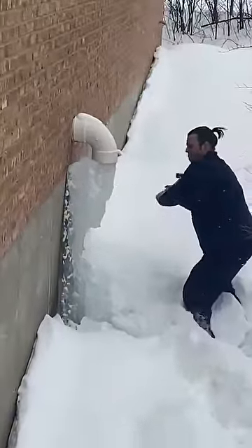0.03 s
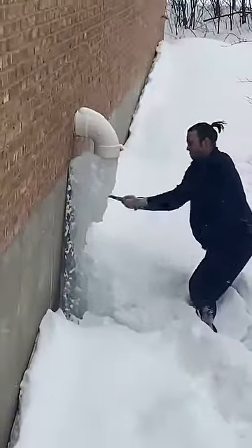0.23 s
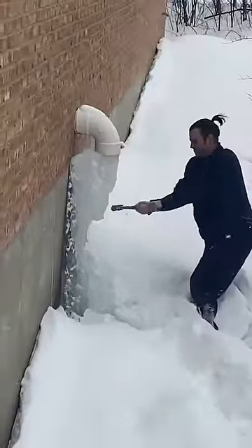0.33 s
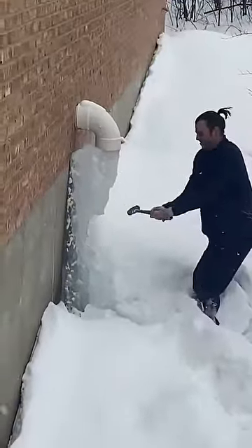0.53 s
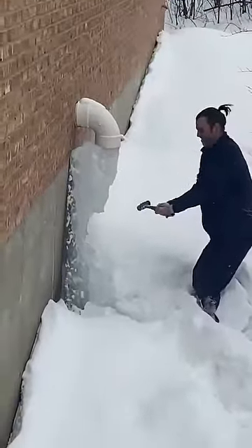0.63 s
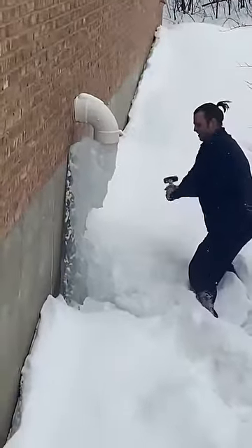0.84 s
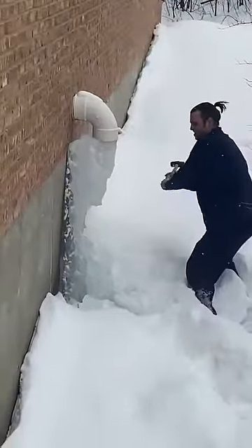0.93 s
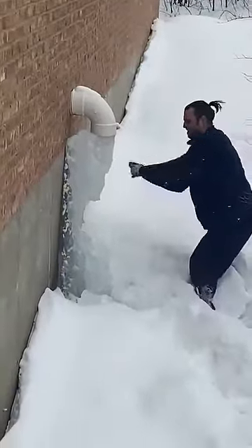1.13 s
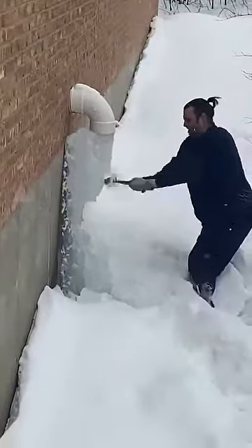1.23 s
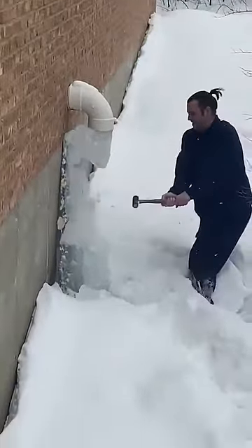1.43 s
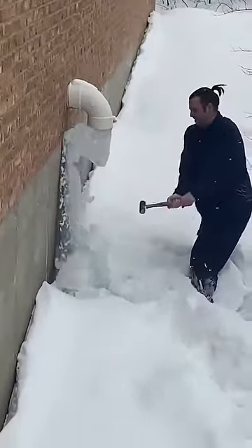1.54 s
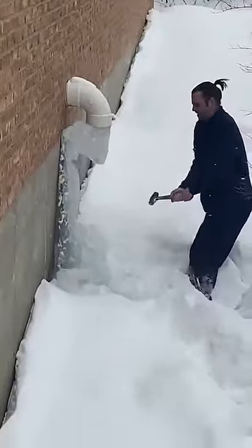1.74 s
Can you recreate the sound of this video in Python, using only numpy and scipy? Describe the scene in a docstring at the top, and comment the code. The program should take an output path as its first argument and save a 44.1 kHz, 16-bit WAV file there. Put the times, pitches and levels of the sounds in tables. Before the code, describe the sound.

A hammer strikes a thick ice column at about 0.2 seconds with a sharp crack and a briefly ringing thump. Chips clink and small lumps knock down until about 1.1 seconds. A second blow comes at 1.2 seconds. At 1.5 a slab lands with a solid knock and crunch, and pieces clatter and crumble until 1.8. Faint echoes and a low, steady outdoor rumble lie underneath.

```python
"""Hammering a column of ice

A hammer hits thick ice twice, beside a brick wall in deep snow, over a low outdoor rumble.
Each blow cracks the surface and sends a falling thump through the column, which rings.
Chips clink down, lumps knock and crumble, and fine crumbs patter. The second blow frees
a slab that lands on the icy foot. The wall and the yard add faint echoes."""
import sys
import numpy as np
from scipy import signal
from scipy.fft import rfft, irfft
from scipy.io import wavfile

SR = 44100
rng = np.random.default_rng(int(sys.argv[2]) if len(sys.argv) > 2 else 0)


def store_pcm(level_fs):
    """Save levels as 16-bit WAV."""
    pcm = np.round(np.clip(level_fs, -1, 1) * 32767).astype(np.int16)
    wavfile.write(sys.argv[1], SR, np.atleast_2d(pcm).T)


N = 79380  # 1.8 seconds


def gain(db):
    """Turn decibels into a number to multiply by."""
    return 10 ** (np.asarray(db) / 20)


def since(start):
    """Seconds since start, zero before it."""
    return np.maximum(np.arange(N) / SR - start, 0)


def swell(start, rise, decay):
    """A level that climbs in a straight line, then dies away; times in seconds."""
    t = since(start)
    return np.minimum(t / rise, 1) * np.exp(-np.maximum(t - rise, 0) / decay)


def ring(start, hz, ring_s):
    """One struck tone that fades by 60 dB in ring_s seconds."""
    t = since(start)
    return np.sin(2 * np.pi * hz * t) * np.exp(-np.log(1000) * t / ring_s)


def cut_lows(x, hz):
    """Turn down everything below hz."""
    return signal.sosfilt(signal.butter(2, hz, "high", fs=SR, output="sos"), x)


def colour(x, curve):
    """Shape x with a curve of (frequency [Hz], level [dB]), then set its strength (rms) to 1."""
    hz, db = np.array(curve, float).T
    f = np.maximum(np.fft.rfftfreq(N, 1 / SR), 1)
    shaped = irfft(rfft(x) * gain(np.interp(np.log(f), np.log(hz), db)), N)
    return shaped / shaped.std()


# Tone colour of the distant rumble (frequency [Hz], level [dB])
RUMBLE_COLOUR = [(20, -6), (35, -7), (60, 0), (120, -6), (175, 0.5), (250, -8.5), (500, -11), (900, -14),
                 (1500, -25), (3000, -34), (5500, -40.5), (9000, -44.5), (16000, -46)]
def outdoors():
    """A steady distant rumble with a wavering low hum."""
    middle, side = (colour(rng.standard_normal(N), RUMBLE_COLOUR) for _ in range(2))
    rumble = middle + gain(-13.5) * side * np.array([[1], [-1]])  # added left, subtracted right
    waver = colour(rng.standard_normal(N), [(3, 0), (30, -50), (300, -120)])
    hum_hz = 96.5 * (1 + 0.036 * waver)
    hum = (1 + 0.29 * waver) * np.sin(2 * np.pi * np.cumsum(hum_hz) / SR)
    return gain(-41) * rumble + gain(-44) * hum


def fractures(curve, per_s, spread_db):
    """Many tiny breaks in the ice, each a click; spread_db makes their sizes uneven."""
    breaks = rng.random(N) < per_s / SR
    size = gain(spread_db * np.minimum(rng.exponential(size=N), 4))
    return colour(breaks * size * rng.choice([-1, 1], N), curve)


def splinters(count, low_hz=2111, high_hz=14980, decay_cycles=13.3, spread_db=2.5):
    """A cloud of tiny splinters, each pinging at its own pitch."""
    t = np.arange(2048) / SR
    out = np.zeros(N + len(t))
    for when, pitch, softness in rng.random((count, 3)):
        hz = low_hz * (high_hz / low_hz) ** pitch
        ping = np.sin(2 * np.pi * hz * t) * np.exp(-t * hz / decay_cycles)
        first = int(when * N)
        out[first:first + len(t)] += gain(-spread_db * np.log(softness + 0.0066)) * ping
    return out[:N] / out.std()


def thump(start, first_hz, last_hz, glide_s):
    """Waves bend the column: a thump that falls in pitch, its bounce off the wall and a deep thud."""
    rise_s, hold_s, fade_s, echo_s = 0.0012, 0.0074, 0.00069, 0.0064
    thud_hz, thud_delay_s, thud_width_s = 118, 0.0097, 0.011
    t = since(start)
    hz = last_hz + (first_hz - last_hz) * np.exp(-(t / glide_s) ** 2)
    level = np.minimum(t / rise_s, 1) * np.exp(-np.maximum(t - hold_s, 0) / fade_s)
    direct = level * np.sin(2 * np.pi * np.cumsum(hz * (t > 0)) / SR)
    echo = np.interp(since(echo_s), since(0), direct)
    thud = np.sin(2 * np.pi * thud_hz * t) * np.exp(-((t - thud_delay_s) / thud_width_s) ** 2)
    return direct + gain(-16.5) * echo + gain(-19.5) * thud


# The column's natural tones (pitch [Hz], level [dB], ring time [s])
COLUMN_TONES = [(57, -28, 0.18), (91.8, -23, 0.29), (200, -13, 0.013), (350, -9, 0.073), (446, -41.5, 0.16),
                (604, -17.5, 0.054), (1310, -34, 0.066), (1800, -49, .1), (2990, -51, 0.033),
                (4136, -19, 0.025)]
def column(start):
    """The struck column rings with all its natural tones at once."""
    tones = sum(gain(db) * ring(start, hz, ring_s) for hz, db, ring_s in COLUMN_TONES)
    return tones * np.minimum(since(start) / 0.0026, 1)


# Tone colours of the crack, the spray and the low shudder (frequency [Hz], level [dB])
CRACK_COLOUR = [(150, -17), (700, -5), (1400, 10.5), (2300, 0), (4100, 1), (6000, 3), (8000, -5),
                (10000, -7.5), (13000, -8.5), (16000, -25)]
SPRAY_COLOUR = [(100, -6), (350, 18.5), (600, 8), (1000, 6), (2000, 1), (4000, 2.5), (6000, -20),
                (9000, -6.5), (16000, -13)]
SHUDDER_COLOUR = [(20, -21), (55, 4), (110, -3.5), (190, -8.5), (300, -5), (800, -41)]
# Hammer blows (time [s], thump level [dB], first pitch [Hz], last pitch [Hz], glide time [s],
# crack level [dB], crushing time [s], snap level [dB], thump delay [s], spray level [dB],
# spray decay [s], shudder decay [s])
HAMMER_BLOWS = [(0.22, 0, 901, 268, 0.002093, -10, 0.0025, -20, 0.00012, -31, 0.051, 0.072),
                (1.1739, -2.5, 1020, 245.5, 0.002, -13, 0.0027, -32, 0.000757, -25, 0.021, 0.039)]
def hammer():
    """Each blow cracks and snaps the surface; the column thumps, rings, shudders and sprays splinters."""
    crack = fractures(CRACK_COLOUR, per_s=26000, spread_db=2.5)
    spray = fractures(SPRAY_COLOUR, per_s=6500, spread_db=4.5) + gain(-10) * splinters(count=1500)
    shudder = colour(rng.standard_normal(N), SHUDDER_COLOUR)
    out = np.zeros(N)
    for (start, thump_db, first_hz, last_hz, glide_s, crack_db, crush_s,
         snap_db, delay_s, spray_db, spray_s, shudder_s) in HAMMER_BLOWS:
        thump_at = start + delay_s
        out += gain(crack_db) * crack * swell(start, 0.00019, crush_s)
        out += gain(snap_db) * ring(thump_at, hz=1684, ring_s=0.014)
        out += gain(thump_db) * (thump(thump_at, first_hz, last_hz, glide_s) + column(thump_at))
        out += gain(spray_db) * spray * swell(start, 0.0011, spray_s)
        out += gain(-28) * shudder * swell(start, 0.0027, shudder_s)
    return out


# Tone colour of sound glancing off the bricks (frequency [Hz], level [dB])
BRICK_COLOUR = [(60, -43), (250, -26), (600, -21), (1200, -11), (2500, -23), (5000, -53), (10000, -13)]
def brick_echo(x, decay_s=0.0032):
    """The wall scatters sound straight back, which makes the ice seem a little wider."""
    burst = rng.standard_normal(N) * np.exp(-since(0) / decay_s)
    burst /= np.linalg.norm(burst)
    tint = gain(np.interp(np.fft.rfftfreq(N, 1 / SR), *np.array(BRICK_COLOUR).T))
    return irfft(rfft(x) * rfft(burst) * tint, N) * np.array([[1], [-1]])


def yard_echo(x, ring_s=0.4):
    """A faint, thin echo from the walls and trees."""
    tails = rng.standard_normal((2, N)) * swell(0.0034, 0.0012, ring_s / np.log(1000))
    middle, side = tails / np.sqrt(np.sum(tails ** 2, axis=1, keepdims=True))
    tail = middle + gain(-21) * side * np.array([[1], [-1]])
    thin = cut_lows(x, hz=950)
    return gain(-14) * signal.fftconvolve(thin[None], tail, axes=1)[:, :N]


# Tone colour of small bits of ice, both chips and crumbs (frequency [Hz], level [dB])
ICE_BIT_COLOUR = [(200, 6.5), (900, 8), (1700, 5), (3000, -4.5), (6000, 0.5), (8500, -1.5), (11500, -2.5),
                  (16000, -8)]
# Chips hitting the ice
# (time [s], click level [dB], click decay [s], ring level [dB], pitch [Hz], ring time [s])
CHIP_HITS = [(0.316, -37.5, 0.0059, -36.5, 2910, 0.018), (0.4607, -31.5, 0.0034, -43, 2710, 0.047),
             (0.472, -46, .004, -41.5, 3030, 0.058), (0.4947, -33, 0.00066, -35.5, 5030, 0.0072),
             (0.5094, -32.5, 0.0036, -52, 5740, .015), (0.527, -46, .002, -42, 6360, .025),
             (0.5322, -32, 0.0022, -32.5, 6060, 0.037), (0.5364, -34, 0.0026, -37, 6300, 0.028),
             (0.541, -45, .001, -35, 6200, .025), (0.558, -34, .003, -43, 3050, 0.018),
             (0.6012, -25.5, .0012, -27.5, 5720, 0.016), (0.601, -53, 0.0018, -44, 4070, 0.1),
             (0.611, -32, 0.0019, -42, 6140, .02), (0.625, -42, .001, -38.5, 4095, .035),
             (0.6356, -34, 0.00092, -29, 2850, 0.0052), (0.639, -33, .0015, -30.5, 4160, 0.047),
             (0.68, -35, 0.002, -55, 4070, .03), (0.6887, -50, .001, -36, 2760, 0.011),
             (0.7197, -50, 0.00075, -44, 4130, 0.051), (0.7804, -37.5, .002, -35.5, 3270, 0.012),
             (1.003, -30.5, 0.0012, -35.5, 3110, 0.027), (1.0056, -31, .003, -38, 4030, 0.052),
             (1.0668, -36, .003, -46, 6040, 0.038), (1.399, -39, 0.0044, -36.5, 3070, 0.039),
             (1.426, -38, .002, -42, 2030, 0.015), (1.4416, -51, .002, -44, 3150, 0.045),
             (1.4506, -29, 0.005, -30, 2750, 0.011), (1.4968, -22, 0.0035, -37, 2370, 0.022),
             (1.555, -27, .004, -37, 2960, 0.018), (1.602, -22.5, 0.0021, -36, 5240, 0.01),
             (1.604, -50, .002, -39, 2280, .045), (1.6327, -20.5, 0.0021, -27, 4730, 0.031),
             (1.666, -27, .002, -54, 4000, 0.018), (1.724, -30, 0.0013, -46, 3200, 0.0095),
             (1.7376, -49, 0.0028, -37, 2330, .035)]
def chips():
    """Small hard pieces click and ring, their tones roughened as they chatter."""
    crackle = cut_lows(fractures(ICE_BIT_COLOUR, per_s=20000, spread_db=0), hz=1300)
    chatter = 1 + 0.3 * colour(rng.standard_normal(N), [(250, 0), (900, -30), (4000, -80)])
    out = np.zeros(N)
    for start, click_db, click_s, ring_db, hz, ring_s in CHIP_HITS:
        close_tone = gain(-21) * ring(start, hz * 1.04, ring_s / 2)
        overtone = gain(-11.5) * ring(start, hz * 1.7, ring_s / 2)
        tone = ring(start, hz, ring_s) + close_tone + overtone
        click = gain(click_db) * crackle * swell(start, 0.0006, click_s)
        # The click is a little stronger near the chip's own pitch.
        clink = signal.lfilter(*signal.iirpeak(hz, Q=1 / 0.47, fs=SR), click)
        out += gain(-3) * click + gain(-11.5) * clink + gain(ring_db) * tone * chatter
    return out


# Lumps landing on packed snow (time [s], level [dB], pitch [Hz], time to peak [s])
LUMP_HITS = [(0.332, -32, 329, 0.0043), (0.4615, -32, 970, 0.00093), (0.51, -22.5, 900, 0.00063),
             (0.562, -26, 885, 0.0008), (0.575, -28, 1140, 0.00075), (0.6387, -31, 1010, 0.00076),
             (1.325, -35, 162.5, 0.0073), (1.4518, -29, 1130, 0.00065), (1.485, -26, 1030, 0.00059),
             (1.5505, -26, 630, 0.0009), (1.5575, -43, 990, 0.00072), (1.559, -18, 500, 0.00087),
             (1.58, -34, 704, 0.002), (1.631, -31, 1140, 0.0028), (1.722, -16, 840, 0.00055),
             (1.7237, -29.5, 441, 0.0029), (1.769, -27.5, 970, 0.00048)]
def lumps(sag=0.033):
    """Bigger pieces land with a short knock that sags in pitch."""
    out = np.zeros(N)
    for start, db, hz, peak_s in LUMP_HITS:
        age = since(start) / peak_s
        pitch = hz * (1 + sag * (2 * np.exp(-age / 2) - 1))
        level = gain(db) * age * np.exp(1 - age)
        out += level * np.sin(2 * np.pi * np.cumsum(pitch * (age > 0)) / SR)
    return out


# Showers of fine crumbs (time [s], level [dB], rise [s], decay [s])
CRUMB_SHOWERS = [(0.452, -46, 0.047, 0.44), (.80, -51, 1, 0.68), (1.005, -49, 0.013, 0.086),
                 (1.25, -48, 0.075, 0.2), (1.478, -34.5, 0.016, 0.1)]
def crumbs():
    """Fine crumbs patter and tinkle down the column."""
    patter = gain(-4) * fractures(ICE_BIT_COLOUR, per_s=2800, spread_db=2.5)
    tinkle = gain(-9) * splinters(count=2500)
    level = sum(gain(db) * swell(start, rise, decay) for start, db, rise, decay in CRUMB_SHOWERS)
    return level * (patter + tinkle)


# Tone colour of crumbling ice (frequency [Hz], level [dB])
CRUNCH_COLOUR = [(100, -29), (330, 16.5), (700, 9), (1200, 6.5), (1700, -1.5), (2600, -2.5), (3600, -15.5),
                 (5500, 0), (8500, -17.5), (12000, -1.5), (16000, -23)]
# Lumps breaking apart (time [s], level [dB], rise [s], decay [s])
LUMP_BREAKS = [(0.56, -36.5, 0.003, 0.01), (1.484, -41.5, .0012, 0.038), (1.505, -22.5, 0.0018, 0.018),
               (1.547, -27.5, 0.0086, 0.028), (1.628, -35.5, 0.0032, 0.05), (1.76, -35.5, 0.004, 0.01)]
def crumbling():
    """Some lumps fall apart in a crunch of tiny breaks and splinters."""
    crunch = fractures(CRUNCH_COLOUR, per_s=1800, spread_db=3) + gain(-9.5) * splinters(count=1800)
    return crunch * sum(gain(db) * swell(start, rise, decay) for start, db, rise, decay in LUMP_BREAKS)


# The slab's natural tones (pitch [Hz], level [dB], ring time [s])
SLAB_TONES = [(340, -11.5, 0.03), (475, -21.5, 0.051), (720, -17, 0.023), (1038, -22, 0.044),
              (1260, -18, 0.021), (2003, -32.5, 0.067)]
# The slab lands and rocks back (time [s], level [dB])
SLAB_KNOCKS = [(1.5071, 0.5), (1.515, 0.5)]
def slab(contact_s=0.0011):
    """A large piece lands on the icy foot with a solid double knock."""
    out = np.zeros(N)
    for start, knock_db in SLAB_KNOCKS:
        tones = sum(gain(db) * ring(start, hz, ring_s) for hz, db, ring_s in SLAB_TONES)
        out += gain(knock_db) * np.minimum(since(start) / contact_s, 1) * tones
    return cut_lows(out, hz=218)


def scene():
    """The ice straight ahead, its echoes and the outdoor background."""
    ice = hammer() + chips() + lumps() + crumbling() + crumbs() + slab()
    return ice + brick_echo(ice) + yard_echo(ice) + outdoors()


# How far the wave at the left microphone runs ahead of the right (frequency [Hz], phase [radians])
LEFT_LEAD = [(0, 0), (400, .03), (950, .02), (1600, -.3), (2600, .15), (3500, .05), (4500, .6), (5200, .4),
             (7200, 3.1), (8700, 4.3), (10000, 6.2), (11500, 6.9), (13000, 9.3), (14700, 9.8),
             (15700, 12.3)]
# How much louder the left is than the right (frequency [Hz], level [dB])
LEFT_LOUDER = [(60, -1), (250, -0.1), (380, -0.5), (700, 2.7), (1290, 3), (2300, 0)]
def record(dry, dip_hz=405, dip_width_hz=12.9, dip_db=-6.5, ceiling=0.97, top_hz=16200):
    """Two microphones, unlike in timing and level, with a narrow dip, rounded peaks and a treble cut."""
    f = np.fft.rfftfreq(N, 1 / SR)
    lead = np.interp(f, *np.array(LEFT_LEAD).T)
    louder_db = np.interp(f, *np.array(LEFT_LOUDER).T)
    timing = np.exp(1j * np.array([lead, -lead]) / 2)
    balance = gain(np.array([louder_db, -louder_db]) / 2)
    dip = gain(dip_db * np.exp(-((f - dip_hz) / dip_width_hz) ** 2))
    heard = irfft(rfft(dry) * dip * balance * timing, N)
    rounded = ceiling * np.tanh(heard / ceiling)
    return signal.sosfilt(signal.ellip(8, 0.2, 70, top_hz, fs=SR, output="sos"), rounded)


dry = scene()
out = record(dry)
store_pcm(out)
```